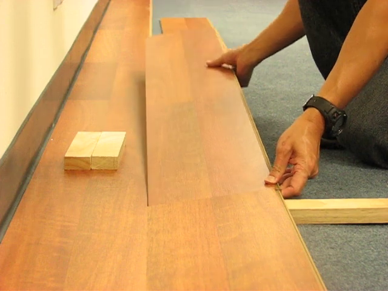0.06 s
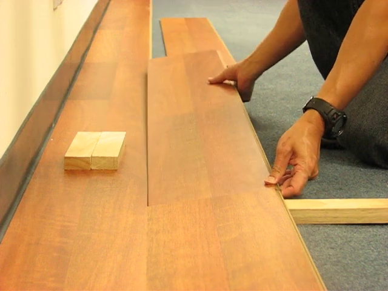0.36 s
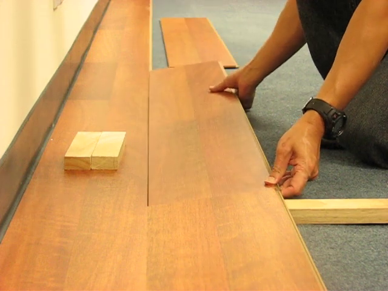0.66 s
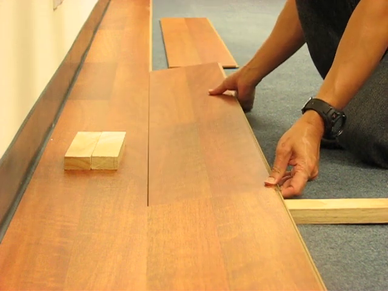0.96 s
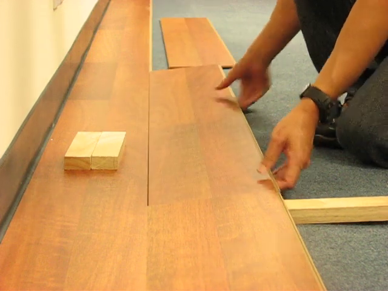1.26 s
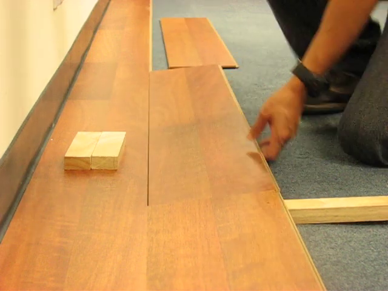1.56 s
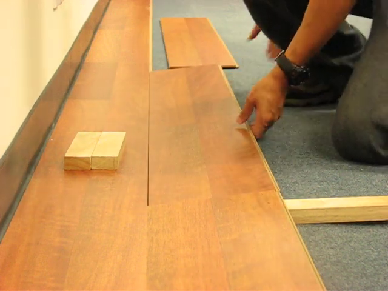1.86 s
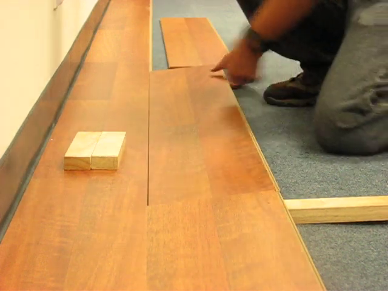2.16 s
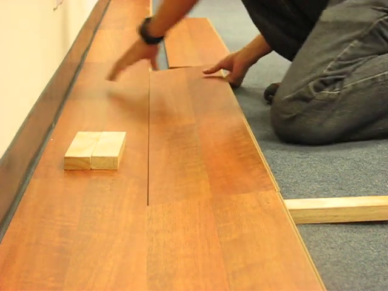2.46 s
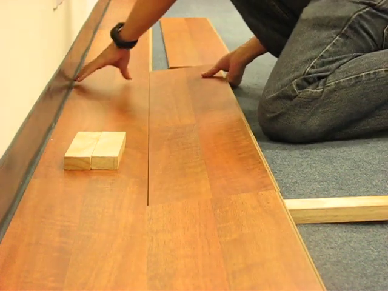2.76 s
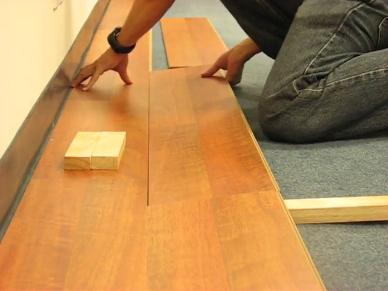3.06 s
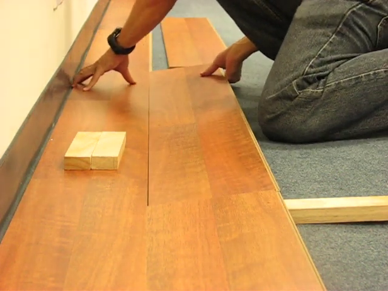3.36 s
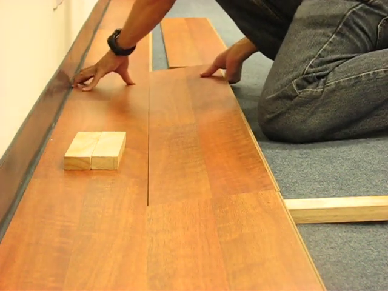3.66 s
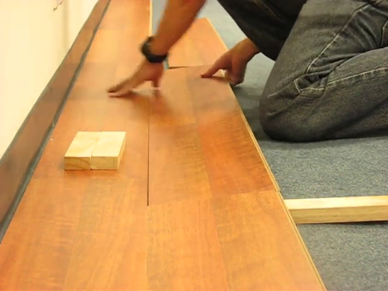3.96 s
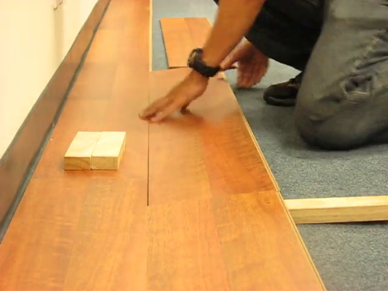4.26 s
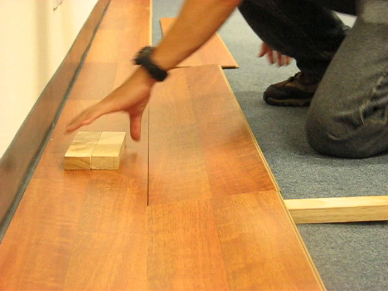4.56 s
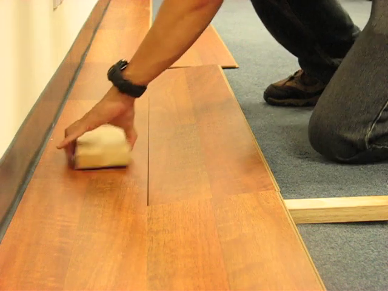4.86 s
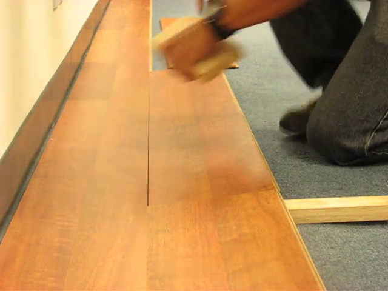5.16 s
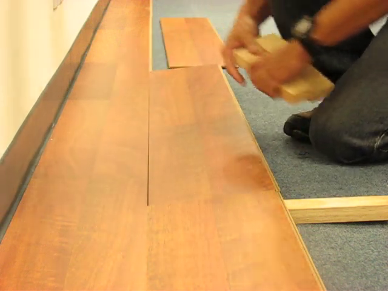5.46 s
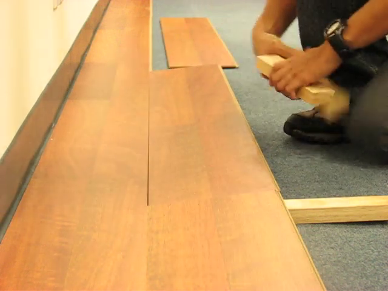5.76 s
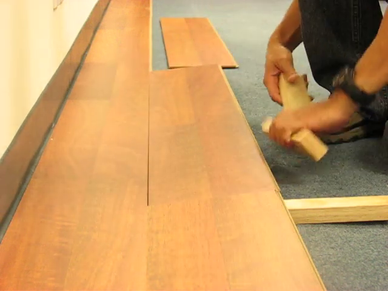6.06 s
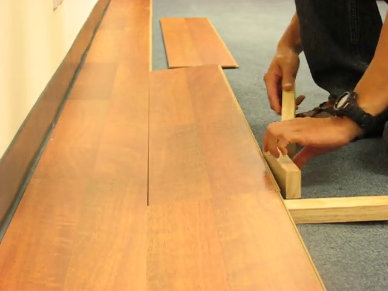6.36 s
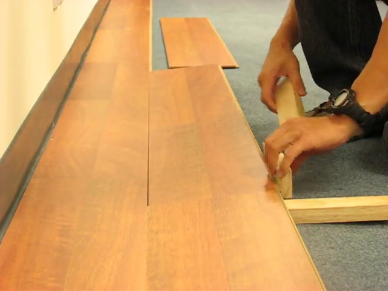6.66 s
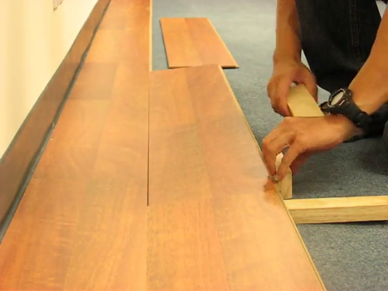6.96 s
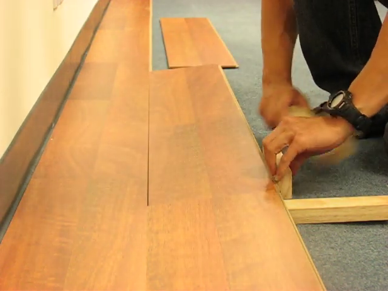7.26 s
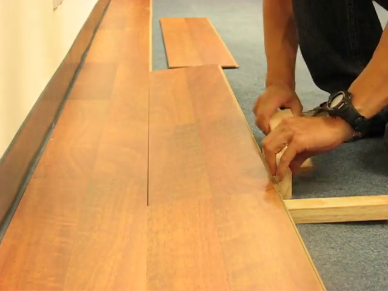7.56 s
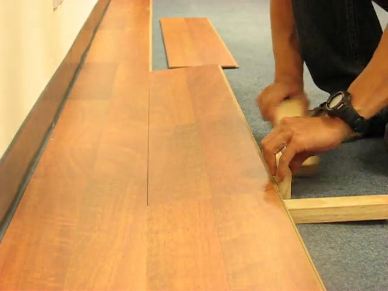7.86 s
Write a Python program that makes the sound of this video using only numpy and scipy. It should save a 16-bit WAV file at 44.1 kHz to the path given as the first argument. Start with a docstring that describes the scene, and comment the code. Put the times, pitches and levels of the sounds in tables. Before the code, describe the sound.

A laminate plank knocks and clicks into place amid soft rubbing, then a wooden block is tapped sharply four times indoors.

```python
"""Laying a laminate plank

A plank is lowered into its groove and pressed home by hand in a carpeted room with a faint hum.
Fingers, a knee and a palm slide with a grainy hiss. A wooden block is picked up and set against the
plank's edge. Four sharp taps with a batten make block and floor ring and overload the microphone."""
import sys
import numpy as np
from scipy import signal
from scipy.fft import rfft, irfft, next_fast_len
from scipy.io import wavfile

SR = 44100
rng = np.random.default_rng(int(sys.argv[2]) if len(sys.argv) > 2 else 0)


def unload_audio(sound):
    """Save the sound as a 16-bit wav file, at the path given as the first command line argument."""
    columns = np.transpose(np.atleast_2d(sound))
    # keep every value between -1 and 1, then stretch to whole-number steps
    steps = np.round(np.clip(columns, -1, 1) * 32767)
    wavfile.write(sys.argv[1], SR, steps.astype(np.int16))


N = 358091
TIME = np.arange(N) / SR
RING_TIME, TAIL_TIME = TIME[:2 ** 13], TIME[:2 ** 15]   # short clocks for ringing wood and room echo


# Each row: start in seconds, strength in dB of the low thump, middle clack, block ring and high crack,
# then hardness in Hz (higher is brighter).
BATTEN_TAPS = [(7.3448, -28, -19.5, -17, -14.5, 5460), (7.57, -22, -9, -7, -1.5, 6300),
               (7.8026, -25, -15, -5, -9, 6500), (8.0321, -18, -5.5, -0.5, 2.5, 6000)]

def batten_taps(field):
    """Hard blows of the batten pass through the block into the plank's edge."""
    out = np.zeros((2, N))
    for start, *force in BATTEN_TAPS:
        tap = room(blow(*force), field, tail_db=2.5, scatter_db=-0.5, echo_db=1.0, scatter_s=0.0064)
        add(out, start, tap)
    return out


# The tones of the floating floor and of the tapping block.
# Each row: pitch in Hz, relative level in dB, seconds to fade by 60 dB.
FLOOR_TONES = [(150, -13.5, 0.053), (231.6, -5.5, 0.039), (292.4, -3, 0.067), (334.6, -2, 0.053),
               (441, -5.5, 0.017), (606, -6.5, 0.045), (652, -4.5, 0.022), (796, -8, 0.017),
               (883, -6.5, 0.014), (1088, -7, 0.008), (1272, -6.5, 0.021), (1357, -7.5, 0.0093),
               (1776, -9, 0.0075), (1920, -10.5, 0.014), (2420, -18.5, 0.0083), (2710, -15.5, 0.021),
               (2960, -11.5, 0.008), (3460, -10, 0.016), (3814, -9, 0.0061), (3734, -5, 0.017),
               (4086, -10.5, 0.011), (4310, -8, 0.0072), (4730, -7, 0.0051), (5170, -4.5, 0.0021),
               (5820, -5, 0.0017), (7020, -12, 0.0031), (7850, -16, 0.0026), (12000, -16.5, 0.00031)]
BLOCK_TONES = [(2030, -14.5, 0.015), (2314, -10, 0.023), (2635, -11, 0.014), (3605, -18.5, 0.023),
               (5050, -22, 0.033)]

def blow(thump_db, clack_db, block_db, crack_db, hardness_hz, travel_s=0.001706, bend_hz=3600):
    """One contact rings floor and block; bending waves in the wood bring the treble first."""
    force = [(380, thump_db), (800, clack_db), (1600, clack_db), (3700, crack_db)]
    floor = ring([(hz, db + at_hz(force, hz), fade_s) for hz, db, fade_s in FLOOR_TONES])
    wood = panned(floor, -0.8) - from_db(block_db) * panned(ring(BLOCK_TONES), -9.5)
    soften = signal.butter(2, min(hardness_hz, 0.4 * SR), fs=SR, output="sos")
    wood = signal.sosfilt(soften, wood)
    hz = np.fft.rfftfreq(len(RING_TIME), 1 / SR)
    delay_s = travel_s / (1 + (hz / bend_hz) ** 2)
    return irfft(rfft(wood) * np.exp(-2j * np.pi * np.cumsum(delay_s) * hz[1]))


def ring(tones):
    """Struck wood rings as fading sine waves; each level is set as if its energy filled 20 ms."""
    out = 0
    for k, (hz, db, fade_s) in enumerate(tones):
        wave = np.sin(2 * np.pi * hz * RING_TIME) * from_db(-60 * RING_TIME / fade_s)
        strength = np.sqrt(np.sum(wave ** 2) / (0.02 * SR))
        out = out + (-1) ** k * from_db(db) * wave / strength
    return out


def knock(thump_db, clack_db, block_db, crack_db):
    """A contact is harder, and so brighter, the more its crack outweighs its thump."""
    hardness_hz = 4300 * 2 ** ((crack_db - thump_db) / 48)   # one octave for every 48 dB
    return blow(thump_db, clack_db, block_db, crack_db, hardness_hz)


def scuff(length_s, force):
    """Things stick and slip: a short swell of tiny blows."""
    swell = np.sin(np.pi * np.minimum(RING_TIME / length_s, 1))
    slips = rng.laplace(size=(1, len(RING_TIME))) * swell
    return signal.fftconvolve(slips / np.linalg.norm(slips), blow(*force, hardness_hz=7500), axes=1)


# The plank lands and clicks in. Each row: start in seconds, then thump, clack and crack in relative dB.
PLANK_CONTACTS = [(0.7074, -31.5, -23, -36.5), (.850, -34.5, -56, -52), (1.539, -34, -48, -40),
                  (1.713, -30, -48.5, -60), (2.818, -60, -58, -45), (2.833, -53, -60, -47),
                  (2.972, -66, -47, -48.5), (3.030, -35.5, -35.5, -33.5), (3.3442, -21.5, -30, -29),
                  (3.778, -38.5, -42, -31.5)]
# The block meets the plank. Each row: start in seconds, then thump, clack, ring and crack in relative dB.
BLOCK_CONTACTS = [(6.2940, -21.5, -19.5, -15.5, -18), (6.358, -30, -40, -51, -59),
                  (6.457, -38.5, -55, -65, -60), (6.673, -22.5, -21.5, -25.5, -26),
                  (6.687, -22.5, -17, -42, -21.5), (6.692, -27, -21, -16.5, -23.5),
                  (7.311, -23.5, -39.5, -41, -32)]
# Scuffs of plank and block; the row at 2.235 s is the kneeling knee creaking. Each row: start and length in
# seconds, then thump, clack, block ring and crack in relative dB.
SCUFFS = [(0.715, 0.014, -31, -75, -60, -74), (0.916, 0.037, -54, -50, -60, -46),
          (1.04, 0.01, -51, -48, -66, -36.5), (1.227, 0.028, -47, -40.5, -47, -30),
          (1.968, 0.059, -53, -48, -69, -55), (2.235, 0.047, -49, -43.5, -58, -32),
          (4.965, 0.043, -51, -47, -52, -50), (5.145, 0.016, -45, -48, -52, -51),
          (5.67, 0.037, -50.5, -43.5, -49, -41), (5.757, 0.027, -48, -56, -52, -40.5),
          (5.98, 0.038, -71, -46.5, -62, -71)]

def laying(field, plank_db=-3.5, block_db=-4.5, scuff_db=0.5):
    """Plank and block knock and scuff as they are put in place, and a knee creaks."""
    sounds = [(start, from_db(plank_db) * knock(thump, clack, -np.inf, crack))   # no block ring
              for start, thump, clack, crack in PLANK_CONTACTS]
    sounds += [(start, from_db(block_db) * knock(*force)) for start, *force in BLOCK_CONTACTS]
    sounds += [(start, from_db(scuff_db) * scuff(length, force)) for start, length, *force in SCUFFS]
    out = np.zeros((2, N))
    for start, sound in sounds:
        add(out, start, room(sound, field, tail_db=-3.0, scatter_db=-4.0, echo_db=-5.0, scatter_s=0.019))
    return out


# Each row: arrival time, rise, hold and fall in seconds, then level in dB.
FINGER_STROKES = [(1.24, .24, 0.12, 1, -39.5), (1.72, 1, 0.075, 0.29, -38),
                  (1.98, 0.19, 0.023, 0.035, -37.5)]
# A colour says how strong the lows and highs are. Each row: frequency in Hz, relative level in dB.
FINGER_HISS = [(710, -57), (1200, -23), (1680, -17), (2230, -17), (3180, -10), (3700, 1.5), (4170, 2.5),
               (5590, -4.5), (6100, -2), (6580, -6), (8000, -7), (10400, -15.5), (16000, -33)]

def finger():
    """A finger rubs along the plank's edge in three merging pushes."""
    return strokes(FINGER_STROKES) * rub(FINGER_HISS, grain_db=0.55, pan_db=-2.0)


# Each row: arrival time, rise, hold and fall in seconds, then level in dB.
KNEE_STROKES = [(2.25, 0.35, 0.083, 0.48, -38.5)]
# Each row: frequency in Hz, relative level in dB.
KNEE_HISS = [(400, -4.5), (900, -13), (1600, -16), (2700, -7.5), (3400, -3), (4100, -1.5), (5000, -7),
             (7000, -7), (10400, -16.5), (16000, -40)]

def knee():
    """A knee hisses as it drags over the carpet."""
    return strokes(KNEE_STROKES) * rub(KNEE_HISS, grain_db=0.5, pan_db=-1.0)


# Each row: arrival time, rise, hold and fall in seconds, then level on arrival in dB.
PALM_STROKES = [(3.80, 0.12, 0.396, .12, -43.5), (4.215, 0.029, 0.058, 0.13, -34)]
# Each row: frequency in Hz, relative level in dB.
PALM_HISS = [(880, -44), (1500, -14.5), (1960, -19.5), (3550, 0.5), (5660, -3), (6890, -3), (9280, -9),
             (11800, -13), (14500, -23), (16000, -32)]
PALM_SWELL_DB_PER_S = 16

def palm():
    """A palm wipes the laminate, growing louder, then flicks off."""
    return strokes(PALM_STROKES, PALM_SWELL_DB_PER_S) * rub(PALM_HISS, grain_db=0.0, pan_db=-1.5)


# Each row: frequency in Hz, relative level in dB.
PRESSING_HISS = [(600, -6.5), (1100, -6.5), (1600, -9), (2400, 2), (3200, -3.5), (5000, -31)]

def pressing(palm_db=-12.5, knee_db=-6.0):
    """Palm and knee press down and add a duller rub; the knee drags just before it hisses."""
    wipe = from_db(palm_db) * strokes(PALM_STROKES, PALM_SWELL_DB_PER_S)
    drag = from_db(knee_db) * strokes(KNEE_STROKES, lead_s=0.056)
    return (wipe + drag) * rub(PRESSING_HISS, grain_db=0.5, pan_db=-3.0)


# The arm reaches out. Each row: arrival time, rise, hold and fall in seconds, then relative level in dB.
SLEEVE_STROKES = [(4.55, 0.23, 0.27, 0.82, -53.5)]
# The block shifts. Each row: arrival time and hold in seconds, then rustle and ring in relative dB.
BLOCK_GRIPS = [(4.99, .005, -53, -59), (5.17, 0.035, -53, -55), (5.358, .008, -52.5, -54),
               (5.451, .02, -46, -51), (5.51, 0.049, -52.5, -60), (5.667, 0.034, -42, -48),
               (5.744, 0.014, -44.5, -57), (5.897, .01, -53, -56), (6.188, .02, -56, -67),
               (6.245, 0.014, -52, -56)]
# Each row: frequency in Hz, relative level in dB.
RUSTLE_HISS = [(530, -43), (900, -21), (1510, -17), (2420, -7), (3300, -8), (3640, -5.5), (4360, -13.5),
               (5610, -7), (10900, -13.5), (16000, -38)]

def handling(rustle_db=1.5, ring_db=-1.5, rise_s=0.071, fall_s=0.085, ring_stretch=2.8):
    """Sleeve and hands rustle; held in the air, the rubbed block rings longer."""
    grips = [(time, rise_s, hold, fall_s, db) for time, hold, db, _ in BLOCK_GRIPS]
    rustle_gain = from_db(rustle_db) * strokes(SLEEVE_STROKES + grips)
    rings = [(time, rise_s, hold, fall_s, db) for time, hold, _, db in BLOCK_GRIPS]
    ring_gain = from_db(ring_db) * strokes(rings)
    friction = rub(RUSTLE_HISS, grain_db=1.5, pan_db=-1.5)
    free_ring = ring([(hz, db * 0.5, fade_s * ring_stretch) for hz, db, fade_s in BLOCK_TONES])
    block = rms_one(signal.fftconvolve(friction, free_ring[None], axes=1)[:, :N])
    return rustle_gain * friction + ring_gain * block


def rub(colour, grain_db, pan_db):
    """Friction hiss, made grainy by the texture passing under the skin."""
    grain = from_db(grain_db * drift(350) + 0.79 * drift(40))
    return panned(rms_one(noise(colour) * grain), pan_db)


def strokes(rows, swell_db_per_s=0, lead_s=0):
    """Loudness of slides: each rises until it arrives, holds, then falls; rise and fall span 20 dB."""
    power = 0
    for arrival, rise, hold, fall, db in rows:
        age = TIME - arrival + lead_s
        fade = np.maximum(-age, 0) / rise + np.maximum(age - hold, 0) / fall
        level_db = db + swell_db_per_s * np.clip(age, 0, hold) - 20 * fade
        power = power + from_db(np.maximum(level_db, -200)) ** 2
    return np.sqrt(power)


# Echoes off the nearby wall and ceiling. Each row: delay in seconds, relative level in dB.
NEAR_ECHOES = [(.0046, -3), (.0085, -38), (0.025, -8.5)]

def room(sound, field, tail_db, scatter_db, echo_db, scatter_s, smear_s=0.01):
    """Each blow spreads differently: fresh scatter off the floor, smeared near echoes and a tail."""
    white, bands = field
    early, late = (i + np.arange(len(TAIL_TIME)) for i in rng.integers(0, 2 * len(TAIL_TIME), size=2))
    bounces = [(0, scatter_db, scatter_s)] + [(delay, db + echo_db, smear_s) for delay, db in NEAR_ECHOES]
    power = 0
    for delay, db, spread in bounces:
        fade = (TAIL_TIME > delay) * np.exp(-2 * np.abs(TAIL_TIME - delay) / spread)
        power = power + from_db(db) ** 2 * fade / fade.sum()
    tail = sum(band[:, late] * fade for band, fade in bands)
    response = white[:, early] * np.sqrt(power) + from_db(tail_db) * tail
    response[:, 0] += 1   # the direct path
    return signal.fftconvolve(sound, response, axes=1)


# The room's lingering tail. Each row: frequency in Hz, seconds to fade by 60 dB, relative level in dB.
ROOM_TAIL = [(146.4, 0.65, -4), (350, 0.26, -4), (1160, 0.31, -1), (2400, 0.48, -12.5), (3360, 0.6, -12),
             (4600, 0.41, -20.5), (7000, 0.48, -6), (13750, 0.12, 3)]

def echo_field():
    """Countless echoes blur into noise: gives white noise and its bands, each with its own fade."""
    white = noise([(20, 0), (20000, 0)])[:, :3 * len(TAIL_TIME)]
    edges_hz = np.geomspace(80, 18000, 13)
    rows, bands = np.array(ROOM_TAIL), []
    for low, high in zip(edges_hz, edges_hz[1:]):
        band = signal.sosfiltfilt(signal.butter(2, [low, high], "band", fs=SR, output="sos"), white)
        fade_s, db = (at_hz(rows[:, [0, k]], np.sqrt(low * high)) for k in (1, 2))
        fade = from_db(-60 * TAIL_TIME / fade_s) * (1 - np.exp(-TAIL_TIME / 0.0053))
        bands.append((band, from_db(db) * fade / np.linalg.norm(fade)))
    return white, bands


# Each row: pitch in Hz, level in dB.
MAINS_HUM = [(60, -63.5), (120, -55.5), (240, -54), (360, -63)]
# Each row: pitch in Hz, level in dB, pitch wander in Hz.
THIN_WHINE = [(7900, -74.5, 24), (8240, -77, 14), (8266, -63, 8.1), (10600, -69, 41)]

def electric_hum():
    """The mains hum flickers in level, and a thin electric whine wavers in pitch."""
    out = 0
    for hz, db in MAINS_HUM:
        out += from_db(db + 2.0 * drift(14)) * np.sin(2 * np.pi * (hz * TIME + rng.random()))
    for hz, db, wander in THIN_WHINE:
        pitch_hz = hz + wander * (drift(2.9) + drift(270))
        out += from_db(db) * np.sin(2 * np.pi * np.cumsum(pitch_hz) / SR)
    return np.sqrt(2) * out


# Each row: frequency in Hz, relative level in dB.
AIR_COLOUR = [(18, -5), (35, -13), (62, 1), (90, -5.5), (150, -12), (300, -13), (450, -16), (600, -19),
              (750, -10.5), (930, -21), (2000, -24), (4200, -26.5), (9000, -28), (16000, -38)]

def ventilation(level_db=-50):
    """Ventilation fills the room with a soft, steady rush of air."""
    return from_db(level_db) * noise(AIR_COLOUR)


# Each row: frequency in Hz, how alike the two ears hear it (from 0 to 1).
EAR_LIKENESS = [(60, 1), (300, 0.91), (600, 0.66), (1500, 0.63), (5000, 0.12), (15000, 0.013)]

def noise(colour):
    """Stereo noise of the given colour that seems to come from all around."""
    size = next_fast_len(N)
    hz = np.fft.rfftfreq(size, 1 / SR)
    mid, side = rfft(rng.standard_normal((2, size)))
    alike = np.clip(at_hz(EAR_LIKENESS, hz), 0, 1)
    low_cut = 1 / np.sqrt(1 + (colour[0][0] / (hz + 1)) ** 6)
    pair = np.sqrt(1 + alike) * mid + np.sqrt(1 - alike) * side * [[1], [-1]]
    return rms_one(irfft(pair * low_cut * from_db(at_hz(colour, hz)), size)[:, :N])


def drift(turns_per_s):
    """A random wobble of typical size 1."""
    points = rng.standard_normal(2 ** 14)
    return rms_one(np.interp(TIME * turns_per_s, np.arange(len(points)), points))


def from_db(db):
    """Turn decibels into a multiplier."""
    return 10 ** (np.asarray(db) / 20)


def rms_one(sound):
    """Scale a sound to an average strength (rms) of 1."""
    return sound / np.sqrt(np.mean(sound ** 2) + 1e-20)


def at_hz(points, hz):
    """Read between rows of frequency and value, with octaves evenly spaced."""
    freqs, values = np.transpose(points)
    return np.interp(np.log(np.maximum(hz, 1)), np.log(freqs), values)


def panned(sound, pan_db):
    """Place a sound between the ears; below zero is to the right."""
    return sound * from_db([[pan_db / 2], [-pan_db / 2]])


def add(out, start_s, sound):
    """Mix a sound in at its start time."""
    i = round(start_s * SR)
    out[:, i:i + sound.shape[-1]] += sound[..., :N - i]


def scene():
    """Knocks, taps and slides in the room over a steady background."""
    field = echo_field()
    woodwork = laying(field) + batten_taps(field)
    slides = finger() + knee() + palm() + pressing() + handling()
    return woodwork + slides + electric_hum() + ventilation()


def record(dry, threshold_db=-1.5, release_db_per_s=40.5, attack_s=0.0012, cutoff_hz=16200):
    """Automatic volume control dips too late for the taps, which clip; the highest treble is cut."""
    peak_db = 20 * np.log10(np.abs(dry).max(axis=0) + 1e-9)
    over_db = np.maximum(peak_db - threshold_db, 0)
    held_db = np.maximum.accumulate(over_db + release_db_per_s * TIME) - release_db_per_s * TIME
    lag = np.exp(-1 / (attack_s * SR))
    dip_db = signal.lfilter([1 - lag], [1, -lag], held_db)
    clipped = np.clip(dry * from_db(-dip_db), -1, 1)
    return signal.sosfilt(signal.ellip(10, 0.2, 80, cutoff_hz, fs=SR, output="sos"), clipped)


dry = scene()
out = record(dry)
unload_audio(out)
```